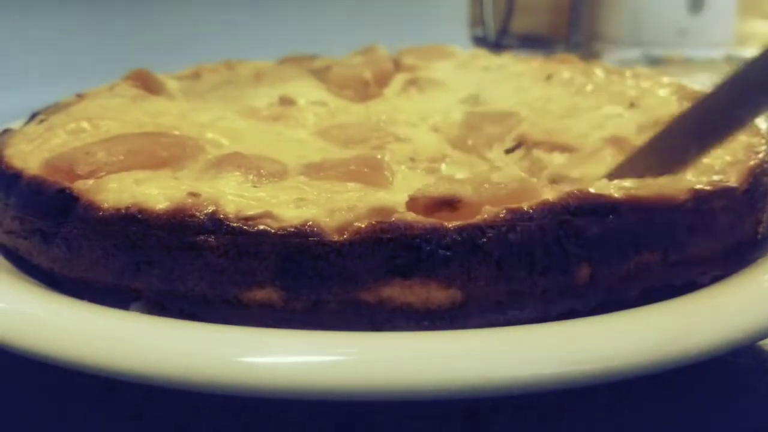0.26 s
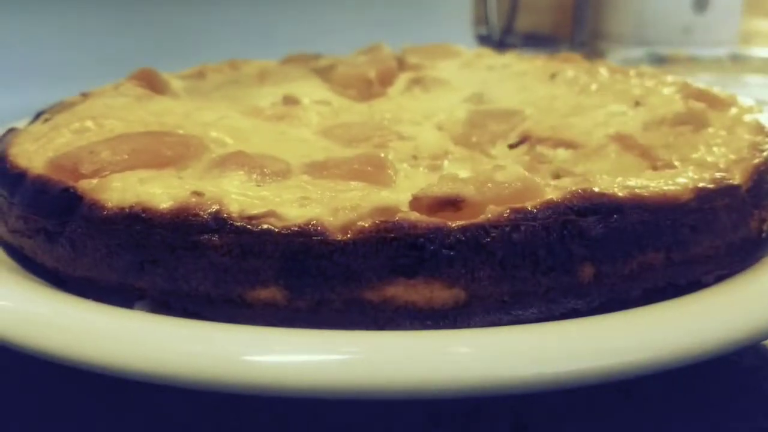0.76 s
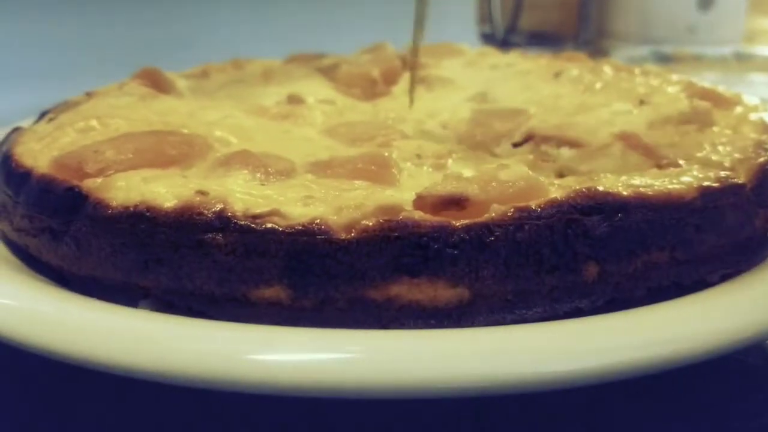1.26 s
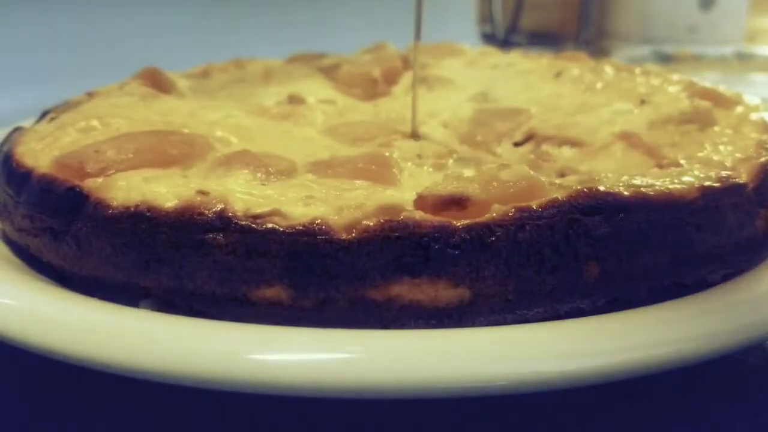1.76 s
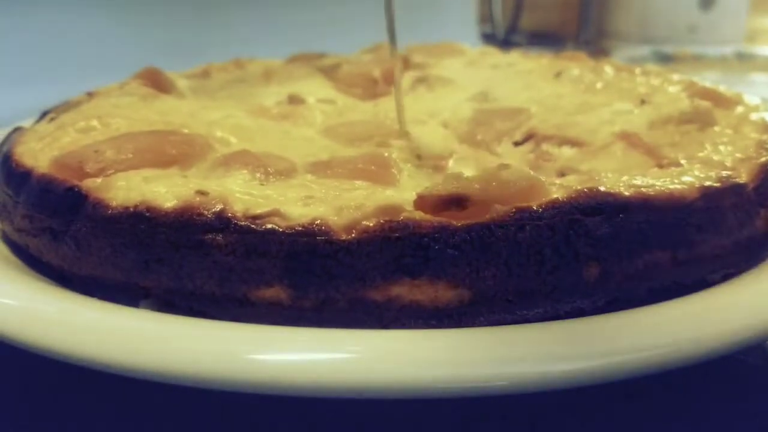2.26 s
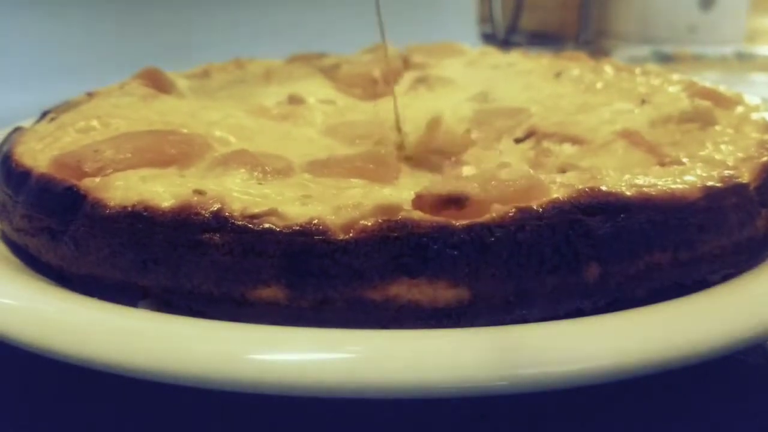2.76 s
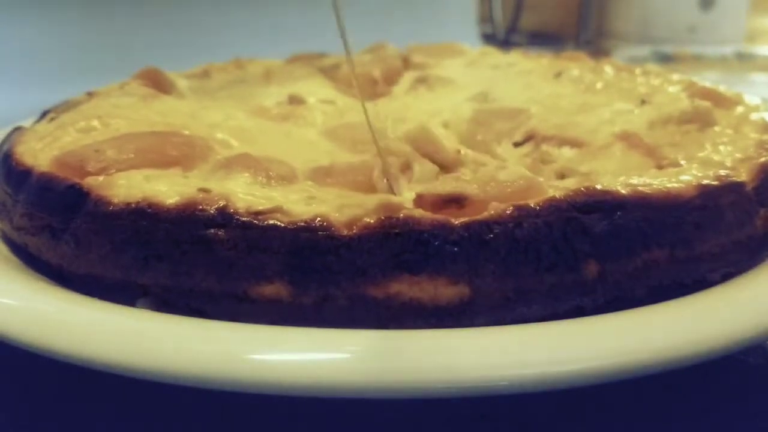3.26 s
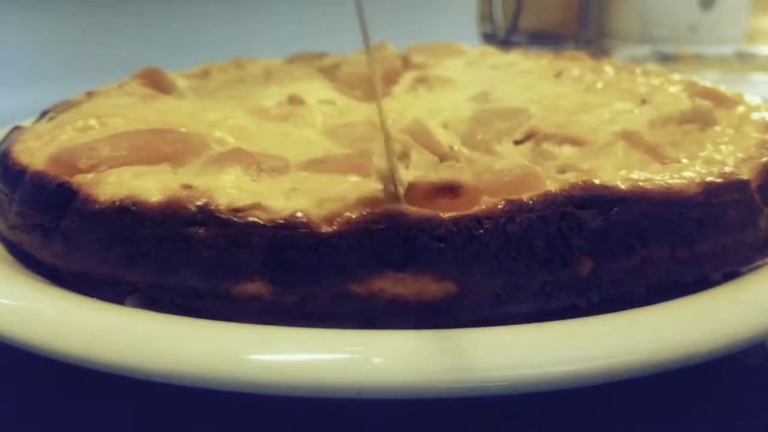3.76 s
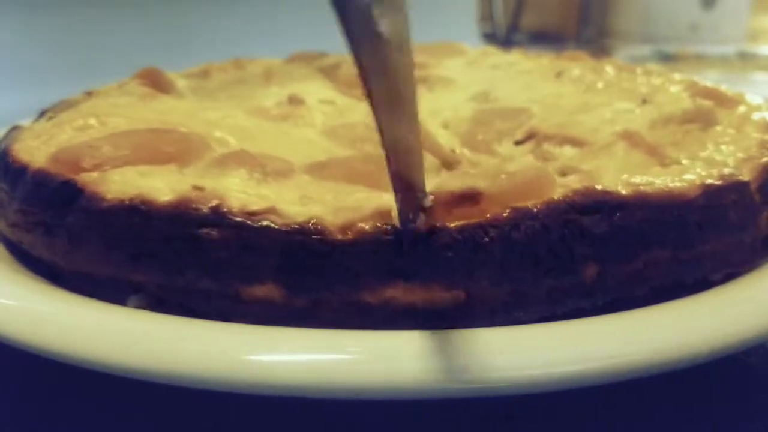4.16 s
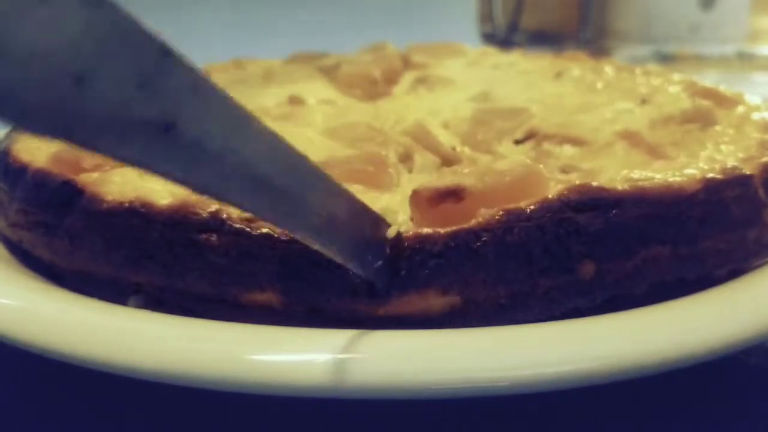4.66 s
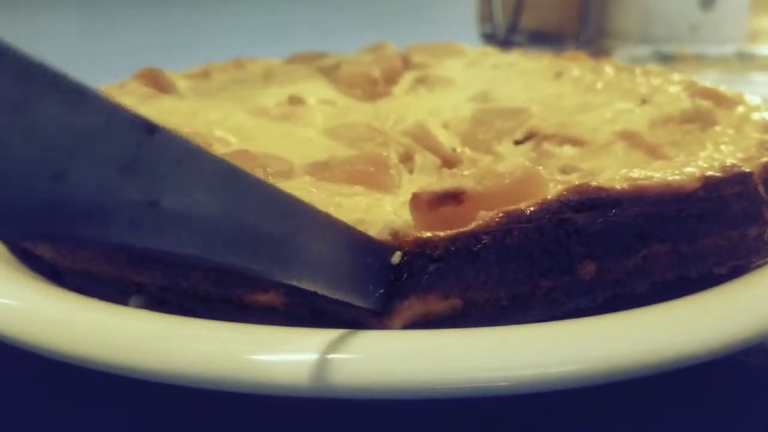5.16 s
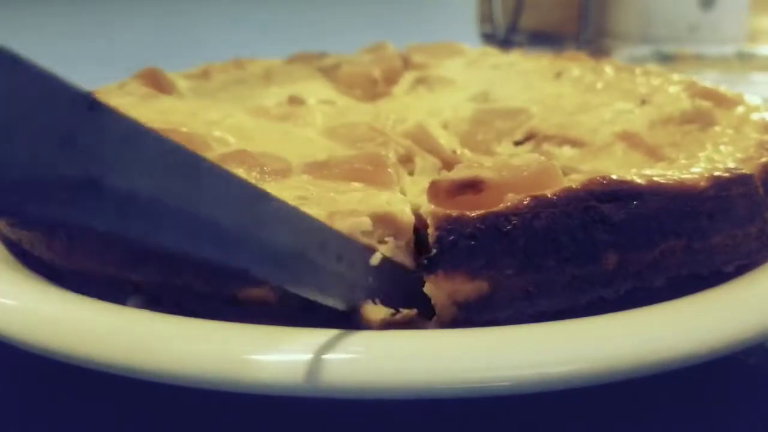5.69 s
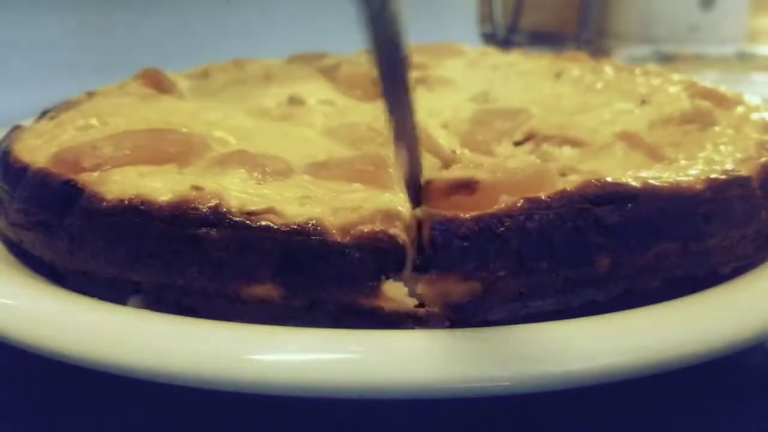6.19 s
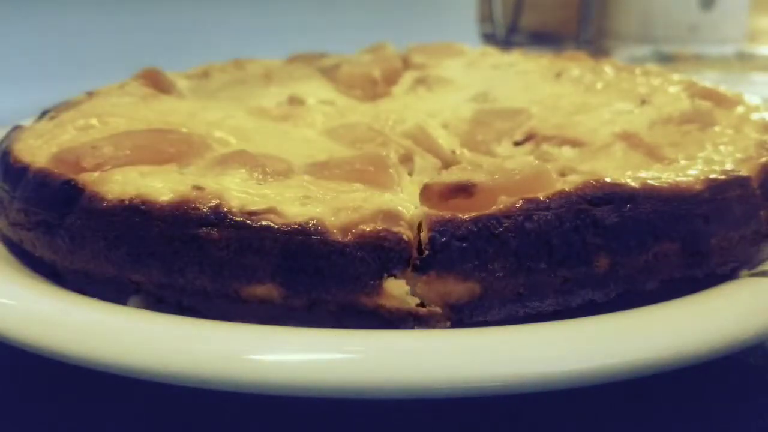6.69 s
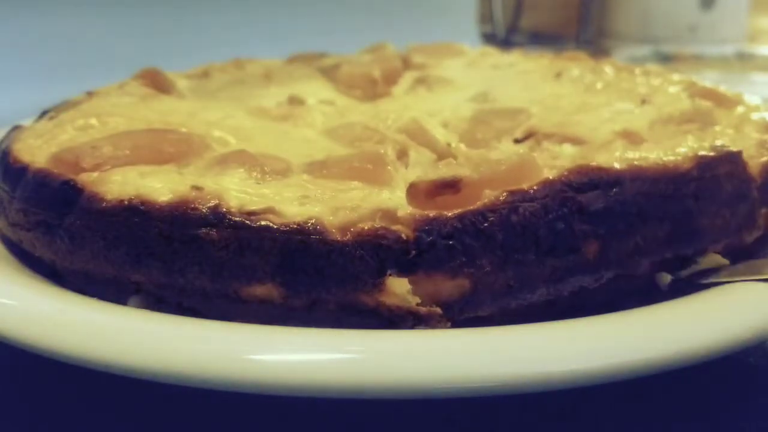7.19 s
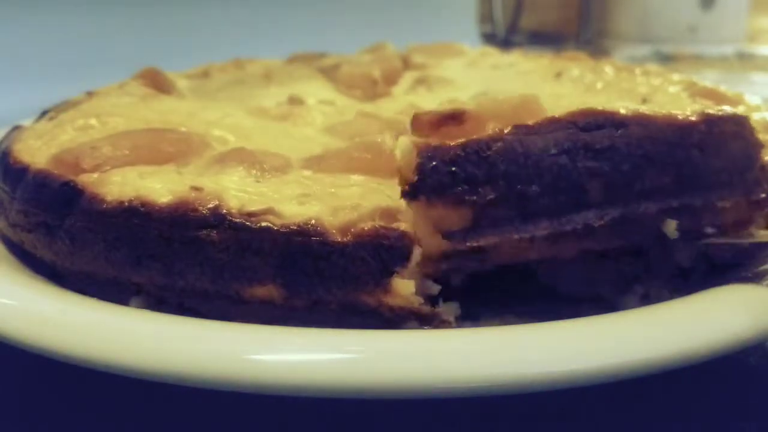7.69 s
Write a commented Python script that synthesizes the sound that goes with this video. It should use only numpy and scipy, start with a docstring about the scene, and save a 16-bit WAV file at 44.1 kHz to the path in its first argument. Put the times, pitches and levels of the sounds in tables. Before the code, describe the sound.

In a quiet kitchen with a faint appliance hum, a knife cuts a tart on a ceramic plate, heard close and mostly on the left. A light crunch comes first, then a run of sharp knocks as the tip meets the plate. Brittle snaps of crust follow in uneven clusters. Near the end the blade clinks and scrapes briefly on the rim, and the crust gives a few last soft crackles.

```python
"""A soft, close crunch: a knife bites into a baked tart on a ceramic plate in a quiet kitchen.
The tip breaks through and knocks, ringing the plate and thudding the worktop. The crust crackles and
snaps with each push, then the blade clinks on the rim and slides on the glaze, setting both singing.
An appliance hums and whines faintly behind. A close pair of unequal microphones leans it all left."""
import sys
import numpy as np
from scipy import signal
from scipy.fft import rfft, irfft, next_fast_len
from scipy.io import wavfile

SR = 44100
rng = np.random.default_rng(int(sys.argv[2]) if len(sys.argv) > 2 else 0)


def file_out(sig):
    """Save sig as 16-bit WAV at sys.argv[1]."""
    # one column per channel
    cols = np.atleast_2d(sig).T
    # limit, then scale
    lim = np.clip(cols, -1, 1)
    pcm = np.round(lim * 32767).astype(np.int16)
    wavfile.write(sys.argv[1], SR, pcm)


N = 349843
TIME = np.arange(N) / SR

# Cue levels are relative: each layer adds its own trim.
# tip hits plate: (time [s], crack [dB], crack treble [dB], crack t60 [s], plate ring [dB],
# worktop thud [dB], thud tilt [dB/octave])
TIP_KNOCKS = [(0.0014, -39, 2, 0.21, -47.5, -62.5, -8), (1.724, -21, 0, 0.024, -32.5, -41, 0.5),
              (1.9182, -11.5, 0.5, 0.024, -25, -36, 0.5), (2.171, -3, 5.5, 0.023, -16.5, -33, -0.5),
              (2.368, -6, 3.5, 0.02, -18, -37.5, -1.5), (3.26, -17.5, 8, 0.027, -46.5, -49.5, -4.5),
              (3.6179, -11.5, 8, 0.021, -63, -38.5, -4.5), (3.977, -17, 8.5, 0.018, -61, -45, -1.5)]
# tone of a knock's crack: (frequency [Hz], level [dB])
CRACK_EQ = [(150, -29), (300, -2.5), (700, -15), (1200, -18), (2000, -11.5), (3000, -11.5), (5000, -5),
            (7000, -7.5), (8800, -17.5), (10500, -6), (13000, -5), (15000, -12), (16800, -21.5)]
# ring of the plate under the tart: (frequency [Hz], level [dB], t60 [s])
PLATE_MODES = [(1440, -9, .03), (1510, -2, .04), (1585, -8, .03), (1655, -2, .035), (1742, 0, .045),
               (1800, -7, .03), (1858, -4, .04), (1930, -9, .025), (4050, -10, .025), (4135, -10, .03),
               (4590, -11, .025), (5160, -13, .025)]
# faint, long, high ring after a knock: (frequency [Hz], level [dB], t60 [s])
SHIMMER_MODES = [(4010, -22, 0.11), (4260, -23, .2), (4730, -24, .2), (4900, -24, .15), (5970, -29, .2),
                 (6400, -26, .15), (6940, -24, .15), (9945, -27, .15), (11700, -20, .15), (12260, -20, .2),
                 (12735, -24.5, .15), (13900, -24.5, .12), (14335, -28, .15)]
# thud of the worktop: (frequency [Hz], level [dB], t60 [s])
WORKTOP_MODES = [(45.4, -10, 0.055), (95, -8, 0.047), (160.5, -7, 0.1), (217, -8, 0.047),
                 (250.4, -4, 0.097), (368.5, -5.5, 0.09), (432, -9.5, 0.04), (548.5, 3, 0.049),
                 (602.4, -1.5, 0.093), (675, -5.5, 0.051), (1210, -16.5, 0.06)]

# pushes of the blade through the tart; the first row is crackle dying away after a knock just before the start:
# (time [s], hold [s], crackle [dB])
CUT_STROKES = [(0.0, 0.012, -56.5), (0.093, 0.2, -67.5), (0.47, 0.16, -64.5), (0.98, .01, -71.5),
               (1.613, 0.36, -70), (2.0, 0.31, -61.5), (2.435, 0.16, -58), (2.744, .06, -66.5),
               (2.92, 0.0089, -69.5), (3.061, 0.058, -58), (3.249, 0.019, -59), (3.33, .03, -73),
               (3.445, 0.012, -62), (3.597, .02, -57.5), (3.69, .27, -63), (4.04, 0.27, -65.5),
               (4.464, 0.072, -52), (4.736, 0.031, -59), (4.914, 0.021, -65.5), (5.14, 0.09, -58.5),
               (5.308, 0.038, -54.5), (5.572, 0.038, -61), (5.899, 0.19, -65), (6.74, .01, -65),
               (6.856, 0.22, -56), (7.038, 0.084, -57), (7.19, 0.026, -64.5), (7.442, 0.026, -57),
               (7.568, 0.014, -64), (7.8, 0.14, -65)]
# featured crust snaps: (time [s], level [dB], low band against high [dB])
LOUD_SNAPS = [(0.224, -25, -18), (0.4858, -37, -12), (2.044, -27, -13), (2.088, -27.5, -3),
              (2.135, -9.5, -17), (2.501, -18, -3), (2.519, -25, 7), (2.558, -18.5, -7),
              (2.629, -27, -16.5), (2.6533, -27, -2.5), (2.7631, -22.5, -7.5), (2.9174, -27, -17),
              (3.03, -20.5, -19), (3.0733, -20, -12.5), (3.1054, -24, 2), (3.774, -24.5, -10.5),
              (3.8437, -21.5, -4), (4.1608, -25.5, -21), (4.251, -24.5, -8.5), (4.4893, -22, 14),
              (4.4983, -18, -20), (4.518, -23, -12), (4.5443, -23.5, -6), (4.6165, -17.5, -7),
              (4.693, -18.5, -17), (4.706, -17, -23), (4.7238, -14.5, -28), (4.7612, -20.5, -13),
              (4.783, -12, -9), (4.884, -21.5, -14), (4.93, -23, -6.5), (4.997, -24.5, -29.5),
              (5.1235, -14.5, -4.5), (5.132, -14, -14), (5.1523, -20.5, 0), (5.22, -23, -7.5),
              (5.24, -22.5, -23), (5.2888, -10.5, -13.5), (5.308, -21, -27), (5.33, -24.5, -5),
              (5.3486, -8.5, -10.5), (5.3577, -14, -10), (5.38, -25.5, 5.5), (5.6252, -23, 6),
              (5.885, -28, -16.5), (5.992, -27, 2), (6.029, -37, 11.5), (7.019, -41, -1), (7.246, -34, -7),
              (7.5613, -31, -20), (7.7683, -29, -6.5), (7.82, -31.5, -7)]
# tone of breaking crust: (frequency [Hz], level [dB])
CRUST_EQ = [(880, -61.5), (1500, -25.5), (1890, -20.5), (1990, -24), (3030, -32.5), (3450, -13.5),
            (4570, -13.5), (6820, 0.5), (8510, -18), (11600, 0.5), (15400, -11.5), (16500, -39)]

# blade touches rim: (time [s], zing [dB], left over right [dB], blade ring [dB], rim ring [dB])
RIM_CLINKS = [(6.6243, -20, -7, -38, -70), (6.6272, -21, -17.5, -29.5, -34), (6.6325, -22, -24, -60, -32),
              (6.6414, -25, 0, -41, -67), (6.6474, -26.5, -23, -40, -52), (6.6556, -21, -7, -57, -59),
              (6.709, -18, -14, -39.5, -47), (6.7134, -25, -8, -44, -81), (6.9899, -51, -21, -55, -53),
              (7.0378, -37, -20, -48, -36), (7.1277, -32.5, -20, -73, -36.5), (7.2794, -42.5, -7, -86, -48)]
# blade slides on rim: (time [s], hold [s], rim [dB], blade [dB])
RIM_SLIDES = [(6.994, 0.018, -67, -73), (7.07, 0.021, -56.5, -50.5), (7.107, 0.016, -63, -82)]
# ring of the blade: (frequency [Hz], level [dB], t60 [s])
BLADE_MODES = [(2900, -14, .03), (3520, -10, .05), (3548, -4, .09), (4550, -12, .025), (8231, -9, .05),
               (12780, -5, .04), (14390, -11, .04)]
# ring of the plate's bare rim: (frequency [Hz], level [dB], t60 [s])
RIM_MODES = [(1443, -3.5, 0.057), (2290, -3.5, 0.053), (2353, 5, 0.042), (5030, -15.5, 0.046),
             (6543, -3.5, 0.028), (6537, 2, 0.034)]
# tone of a clink's zing: (frequency [Hz], level [dB])
ZING_EQ = [(2000, -31), (6000, -19.5), (8200, -18), (9200, -26), (11300, -5), (12800, -4.5), (13800, -13),
           (15500, -25), (17000, -61)]

# tart drags on the glaze: (time [s], hold [s], level [dB])
TART_DRAGS = [(4.775, 0.0048, -75.5), (5.383, 0.0083, -74), (7.435, 0.015, -74.5), (7.59, .02, -72)]
# plate rocks on the worktop: (time [s], level [dB], tilt [dB/octave])
PLATE_ROCKS = [(0.274, -58, -7), (3.19, -59, -3), (4.776, -62, 3.5), (5.366, -48.5, -3.5),
               (5.401, -53, -6.5), (6.627, -44, 0.5), (6.654, -48.5, 2)]
# brief single tones, namely the plate's lingering ring, a squeak, a low clunk and the singing rim:
# (time [s], hold [s], level [dB], frequency [Hz])
SHORT_RINGS = [(0.0, 0.019, -57, 1550), (4.36, 0.073, -68, 1940), (6.638, 0.044, -55.5, 656),
               (7.077, 0.043, -66, 1443)]

# decay of the kitchen's echo: (frequency [Hz], t60 [s])
ROOM_DECAY = [(150, 0.66), (1000, 0.34), (1700, 0.37), (4000, 0.3), (14000, 0.13)]
# fader ride of the room tone: (time [s], rumble [dB], hiss [dB])
ROOM_RIDE = [(0.0, -61.5, -66), (0.31, -59, -69.5), (0.79, -65.5, -76), (1.3, -59.5, -70.5),
             (2.4, -60, -72), (3.82, -60, -71), (5.26, -57, -69), (6.38, -58.5, -70), (6.8, -56, -66),
             (7.73, -56, -67), (7.93, -60.5, -69.5)]
# tone of the rumble: (frequency [Hz], level [dB])
RUMBLE_EQ = [(20, -20.5), (45, -7), (70, -5), (90, -9.5), (113, -16.5), (250, -10), (320, -11.5),
             (360, -12.5), (440, -8.5), (626, -30.5), (1200, -48.5), (1600, -79.5)]
# tone of the hiss: (frequency [Hz], level [dB])
HISS_EQ = [(410, -43.5), (700, -9.5), (2560, -6.5), (2840, -7), (4460, -9), (5730, -9), (6630, 0),
           (8860, -12), (12800, -2.5), (14800, -4.5), (16500, -31.5)]
# mains hum: (frequency [Hz], amplitude against the rumble [dB])
HUM_TONES = [(59.5, 1.5), (119.5, -9.5)]
# thin appliance whines: (frequency [Hz], amplitude against the rumble [dB])
WHINE_TONES = [(1895, -29), (2902, -31), (5033, -28), (5211, -28.5), (6395, -29), (6455, -31.5),
               (6691, -28.5), (6928, -27.5)]

# rough stereo lean of close sounds: (frequency [Hz], left over right [dB])
NEAR_LEAN = [(60, 8), (99, -2), (160, 13), (270, 7.5), (450, 11.5), (740, 8.5), (1220, 16), (2010, 14.5),
             (3330, 16), (5500, 21), (9080, 9.5), (15000, 6.5)]
# stereo lean of the background: (frequency [Hz], left over right [dB])
FAR_LEAN = [(60, 9.5), (110, -0.5), (200, 19.5), (380, 18.5), (700, 8), (1290, 3.5), (2380, 5.5),
            (4400, 4.5), (8120, 12), (15000, 0)]
# how alike the room tone is on both sides: (frequency [Hz], correlation [0-1])
FAR_CORRELATION = [(40, 0.87), (150, 1), (500, 0.37), (1500, .2), (15000, .1)]


def knocks():
    """The tip hits the plate: a jolt and a gritty crack over the plate's ring and the worktop's thud."""
    times, crack_db, treble_db, crack_t60, ring_db, thud_db, tilt_db = np.transpose(TIP_KNOCKS)

    def envelope(levels_db):
        """A sharp jolt, the crack itself and a faint tail."""
        jolt = burst(times + .0014, levels_db + 5, t60=.0035, rise_s=.00049)
        crack = sum(burst([at], [db], t60, rise_s=.0021)
                    for at, db, t60 in zip(times, levels_db, crack_t60))
        tail = burst(times, levels_db - 34.5, t60=.66, rise_s=.011)
        return jolt + crack + tail

    grit = rng.choice([-1, 1], (2, N)) * from_db(4.2 * rng.standard_normal(N))
    dull = grit * envelope(crack_db + 2)
    bright = grit * envelope(crack_db - 5.5 + treble_db)
    left, apart = colour(crossover(dull, bright), CRACK_EQ)
    right = .8 * left + .6 * apart
    # the tip bounces once, 7 ms after landing
    body = strike(np.r_[times + .001, times + .008], np.r_[ring_db + 1.5, ring_db - 1.5], PLATE_MODES)
    body += strike(times + .001, ring_db, SHIMMER_MODES)
    body += strike(times + .0011, thud_db + 7.5, WORKTOP_MODES, tilt_db)
    return microphones(left + body, right + body, lag_s=.0004)


def crust():
    """Brittle snaps over a fine, clumped crackle that follows the blade's pressure."""
    grains_per_s, small_snaps_per_s, resting_db = 4000, 50, -79
    pressure = from_db(resting_db) + swell(*np.transpose(CUT_STROKES), rise_db_s=251.5, fall_db_s=111.5)
    breaks = rng.random(N) < grains_per_s * from_db(4 * drift(hz=40)) / SR
    grain_db = 2.3 * np.minimum(rng.exponential(1, N), 5)
    grains = breaks * from_db(grain_db) * rng.choice([-1, 1], N)
    crackle = pressure * rms_one(colour(grains, CRUST_EQ)[0])

    # small random snaps ride the pressure and fill in between the featured ones
    times, snap_db, dull_db = np.transpose(LOUD_SNAPS)
    small = np.flatnonzero(rng.random(N) < small_snaps_per_s / SR)
    level_scatter, tone_scatter, pan_scatter = rng.standard_normal((N, 3)).T
    times = np.r_[times, small / SR]
    snap_db = np.r_[snap_db, 20 * np.log10(pressure[small]) + 23.5 + 3 * level_scatter[small]]
    dull_db = np.r_[dull_db, -12.5 + 7 * tone_scatter[small]]
    lean_left_db = 7 + 4.5 * pan_scatter[np.round(times * SR).astype(int)]
    fracture = rng.choice([-1, 1], N)  # each snap is about a millisecond of jolts
    sides = []
    for side_db in (snap_db, snap_db - lean_left_db):
        dull, bright = (fracture * burst(times, db, t60=.003, rise_s=.00025)
                        for db in (side_db + dull_db, side_db))
        sides.append(crossover(dull, bright))
    left, right = colour(sides, CRUST_EQ)
    return microphones(left + crackle, right + crackle, lag_s=.00045)


def blade():
    """Clinks on the far rim: a bright zing over ringing blade and rim; sliding keeps both singing."""
    times, zing_db, pan_db, blade_db, rim_db = np.transpose(RIM_CLINKS)
    body = strike(times + .001, blade_db + 6.5, BLADE_MODES)
    body += strike(times + .0011, rim_db + 5, RIM_MODES, tilt_db=10)
    starts, holds, *slide_db = np.transpose(RIM_SLIDES)
    rim_force, blade_force = (swell(starts, holds, db, rise_db_s=503, fall_db_s=302) for db in slide_db)
    body += rub(rim_force, RIM_MODES, slips_per_s=1500)
    body += rub(blade_force, BLADE_MODES, slips_per_s=510)
    chatter = rng.choice([-1, 1], N)
    zings = [chatter * burst(times, zing_db + 15.5 + side * pan_db / 2, t60=.007, rise_s=.0003)
             for side in (1, -1)]
    left, right = colour(zings, ZING_EQ)
    return microphones(body + left, body + right, lag_s=-.00072)


def plate_handling():
    """The plate rocks softly on the worktop, the tart drags on the glaze and brief single tones ring."""
    times, thud_db, tilt_db = np.transpose(PLATE_ROCKS)
    rocking = strike(times, thud_db + 2.5, WORKTOP_MODES, tilt_db)
    body = signal.sosfilt(signal.butter(2, 700, fs=SR, output="sos"), rocking)
    drag = swell(*np.transpose(TART_DRAGS), rise_db_s=200, fall_db_s=113)
    body += rub(drag, PLATE_MODES, slips_per_s=1500)
    ring_t60_s = .037
    for start, hold, db, hz in SHORT_RINGS:
        drive = swell([start], [hold], [db], rise_db_s=1200, fall_db_s=196)  # abrupt attack
        body += rub(drive, [(hz, 0, ring_t60_s)], slips_per_s=2000)
    return microphones(body, body, lag_s=.0004)


def kitchen_echo(near, wet_db=-13, onset_s=.0051):
    """Diffuse reflections: a noise tail that dies band by band, different on each side."""
    t, tail = np.arange(SR // 2) / SR, 0
    edges_hz = 100 * 2 ** np.arange(0, 7.6, .5)
    for low, high in zip(edges_hz, edges_hz[1:]):
        bandpass = signal.butter(2, [low, high], "band", fs=SR, output="sos")
        band = signal.sosfilt(bandpass, rng.standard_normal((2, len(t))))
        tail += band * from_db(-60 * t / at_hz(ROOM_DECAY, np.sqrt(low * high)))
    tail *= 1 - np.exp(-t / onset_s)
    tail /= np.sqrt(np.sum(tail ** 2) / 2)
    return from_db(wet_db) * signal.oaconvolve(near, tail, axes=1)[:, :N]


def room_tone():
    """A bed of rumble and hiss, with an appliance's wavering mains hum and thin whines."""
    times, *rides = np.transpose(ROOM_RIDE)
    rumble_db, hiss_db = (np.interp(TIME, times, ride) for ride in rides)
    size = next_fast_len(N, True)
    hz = np.linspace(0, SR / 2, size // 2 + 1)
    alike = np.clip(at_hz(FAR_CORRELATION, hz), 0, 1)
    bed = np.zeros((2, N))
    for level_db, eq in ((rumble_db, RUMBLE_EQ), (hiss_db, HISS_EQ)):
        left, apart = rfft(rng.standard_normal((2, size))) * from_db(at_hz(eq, hz))
        right = (alike * left + np.sqrt(1 - alike ** 2) * apart) * from_db(-at_hz(FAR_LEAN, hz))
        pair = irfft(np.array([left, right]), size)[:, :N]
        bed += from_db(level_db) * pair / np.std(pair[0])
    for tones, waver_db in ((HUM_TONES, 2.2), (WHINE_TONES, 3)):
        for tone_hz, db in tones:
            tone = np.sin(2 * np.pi * (tone_hz * TIME + rng.random()))
            tone *= from_db(rumble_db + db + waver_db * drift(hz=18))
            bed += tone * from_db([[0], [-at_hz(FAR_LEAN, tone_hz)]])
    return bed


def microphones(left, right, lag_s):
    """The right microphone hears close sounds thinner and lag_s later (earlier if negative)."""
    thinned = colour(right, NEAR_LEAN, amount=-.98)[0]
    return np.array([left, np.roll(thinned, round(lag_s * SR))])


def strike(times, levels_db, modes, tilt_db=0):
    """Each blow wakes each mode with a strength of its own; neighbours swing in opposite senses."""
    scatter_db = rng.normal(0, 2, (len(times), len(modes)))
    pivot_hz = modes[len(modes) // 2][0]
    body = np.zeros(N)
    for k, (hz, db, t60) in enumerate(modes):
        blow_db = levels_db + db + tilt_db * np.log2(hz / pivot_hz) + scatter_db[:, k]
        body += (-1) ** k * ring(clicks(times, blow_db), hz, t60)
    return body


def rub(force, modes, slips_per_s):
    """Dense, uneven slips keep a body's modes singing; rms about 1 at unit force."""
    chance = slips_per_s / SR
    slips = rng.standard_normal(N) * (rng.random(N) < chance) / np.sqrt(chance)
    power = sum(from_db(2 * db) * t60 for _, db, t60 in modes) * SR / (4 * np.log(1000))
    return sum(from_db(db) * ring(force * slips, hz, t60) for hz, db, t60 in modes) / np.sqrt(power)


def ring(drive, hz, t60):
    """One mode: a unit click starts a dying sine of height 1."""
    decay, angle = from_db(-60 / (t60 * SR)), 2 * np.pi * hz / SR
    return signal.lfilter([0, np.sin(angle)], [1, -2 * decay * np.cos(angle), decay ** 2], drive + 1e-18)


def burst(times, levels_db, t60, rise_s):
    """Envelope that leaps up at each cue and dies away."""
    fall, rise = from_db(-60 / (t60 * SR)), np.exp(-1 / (rise_s * SR))
    poles = np.convolve([1, -fall], [1, -rise])
    return signal.lfilter([1 - rise], poles, clicks(times, levels_db) + 1e-18)


def swell(times, holds, levels_db, rise_db_s, fall_db_s):
    """Force that builds up to each cue, holds and lets go; slopes in dB per second."""
    return sum(from_db(db - rise_db_s * np.maximum(at - TIME, 0)
                       - fall_db_s * np.maximum(TIME - at - hold, 0))
               for at, hold, db in zip(times, holds, levels_db))


def clicks(times, levels_db):
    """One spike for each cue."""
    spikes = np.zeros(N)
    np.add.at(spikes, np.round(np.asarray(times) * SR).astype(int), from_db(levels_db))
    return spikes


def drift(hz):
    """Slow random wander with a spread of 1."""
    step = 50
    lowpass = signal.butter(2, hz, fs=SR / step, output="sos")
    slow = signal.sosfilt(lowpass, rng.standard_normal(N // step + 1000))[998:]
    return np.interp(np.arange(N) / step, np.arange(len(slow)), rms_one(slow))


def crossover(dull, bright, split_hz=8800):
    """Join the lows of one sound to the highs of another."""
    low, high = (signal.butter(4, split_hz, kind, fs=SR, output="sos") for kind in ("low", "high"))
    return signal.sosfilt(low, dull) + signal.sosfilt(high, bright)


def colour(x, eq, amount=1):
    """Minimum-phase EQ, so attacks stay crisp; amount scales the dB curve."""
    size = 4096
    gain = from_db(amount * at_hz(eq, np.linspace(0, SR / 2, size // 2 + 1)))
    cepstrum = irfft(np.log(gain))
    cepstrum[1:size // 2] *= 2
    cepstrum[size // 2 + 1:] = 0
    impulse = irfft(np.exp(rfft(cepstrum)))
    return signal.oaconvolve(np.atleast_2d(x), impulse[None], axes=1)[:, :N]


def at_hz(curve, hz):
    """Read a curve on a log-frequency axis."""
    points_hz, values = np.transpose(curve)
    return np.interp(np.log(hz + 1), np.log(points_hz), values)


def from_db(db):
    """Decibels to gain."""
    return 10 ** (np.asarray(db) / 20)


def rms_one(x):
    """Scale to unit power."""
    return x / np.sqrt(np.mean(x ** 2) + 1e-20)


def scene():
    """Close knife work with the kitchen's echo, over the room tone."""
    near = knocks() + plate_handling() + crust() + blade()
    return near + kitchen_echo(near) + room_tone()


def record(dry):
    """The microphone housing dents the treble with a shallow notch, and the very top is cut."""
    notch_hz, width_hz, depth, cutoff_hz = 9100, 3200, .2, 16800
    notch_band = signal.lfilter(*signal.iirpeak(notch_hz, notch_hz / width_hz, fs=SR), dry)
    lowpass = signal.cheby2(10, 60, cutoff_hz, fs=SR, output="sos")
    return signal.sosfilt(lowpass, dry - depth * notch_band)


dry = scene()
out = record(dry)
file_out(out)
```